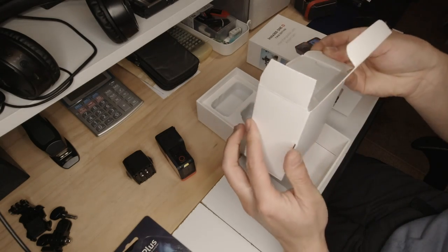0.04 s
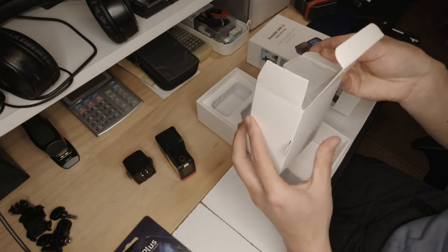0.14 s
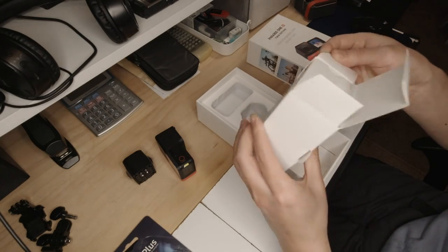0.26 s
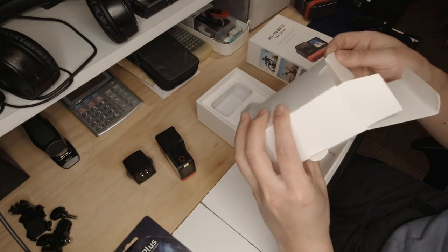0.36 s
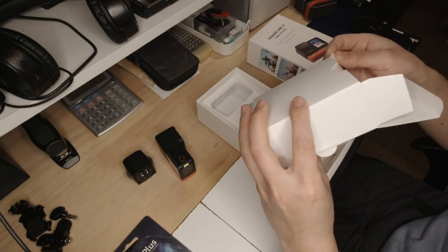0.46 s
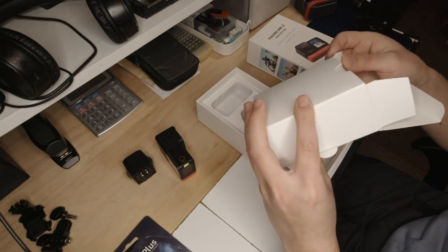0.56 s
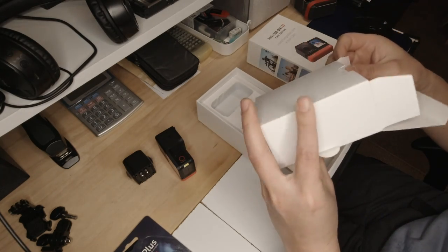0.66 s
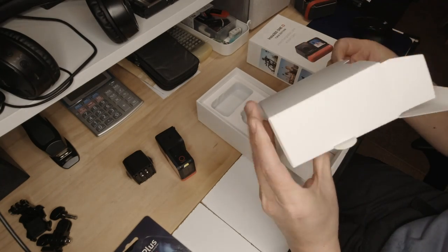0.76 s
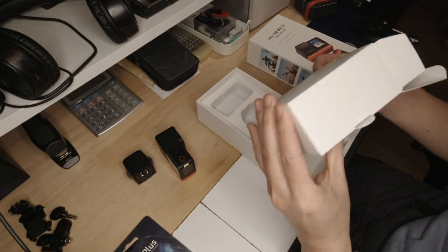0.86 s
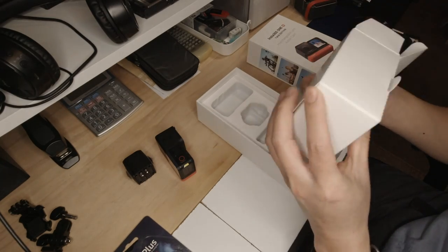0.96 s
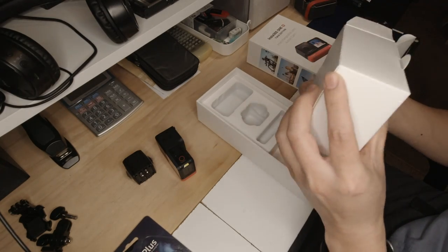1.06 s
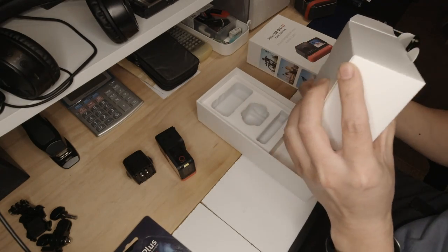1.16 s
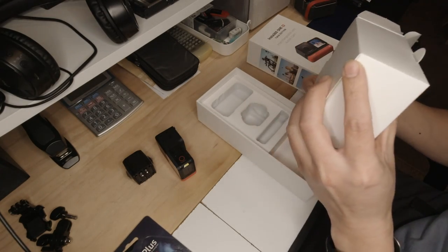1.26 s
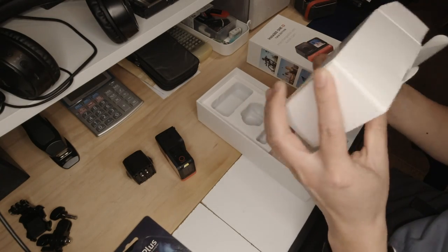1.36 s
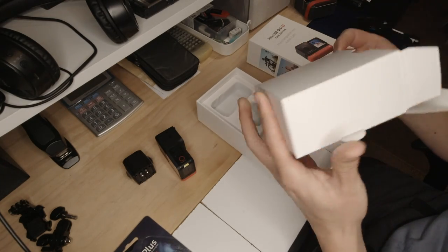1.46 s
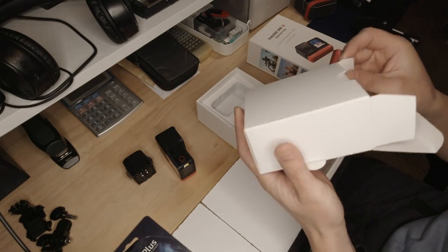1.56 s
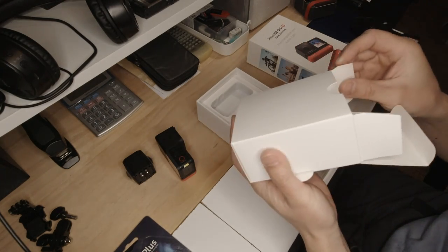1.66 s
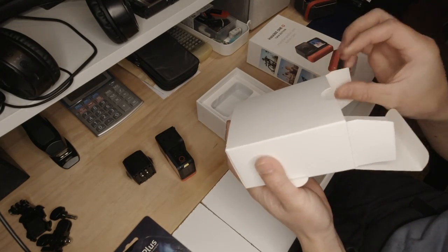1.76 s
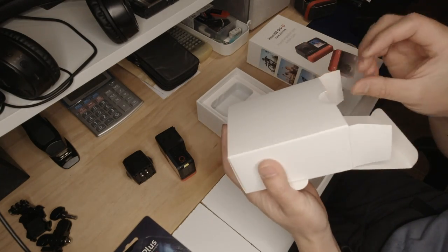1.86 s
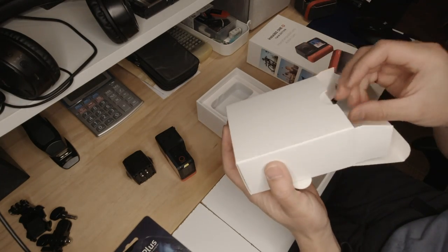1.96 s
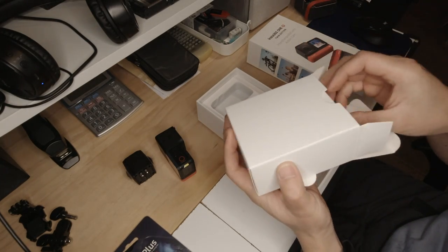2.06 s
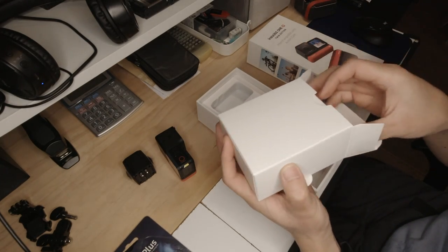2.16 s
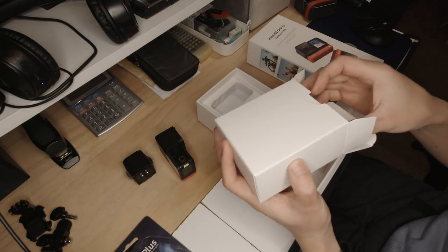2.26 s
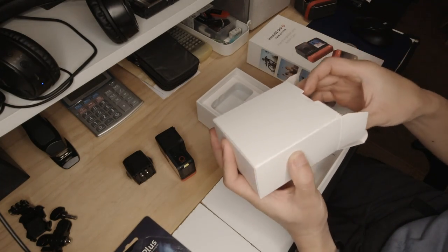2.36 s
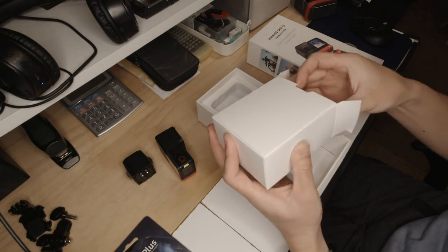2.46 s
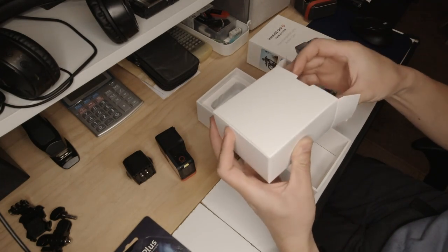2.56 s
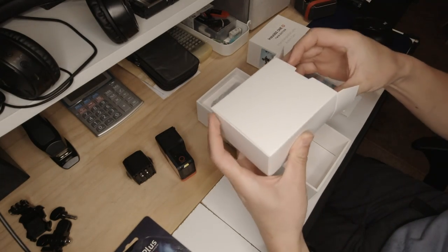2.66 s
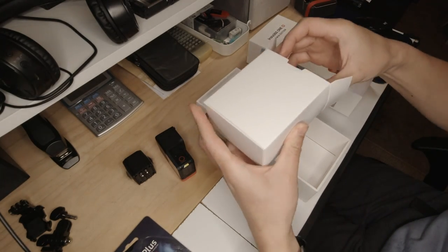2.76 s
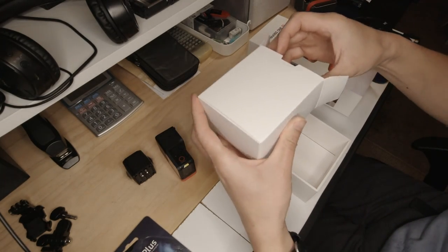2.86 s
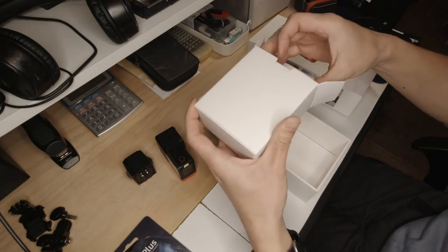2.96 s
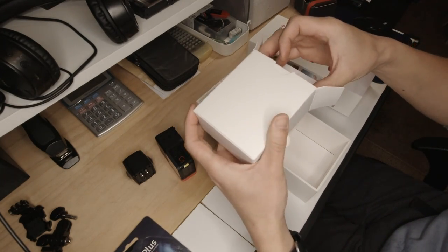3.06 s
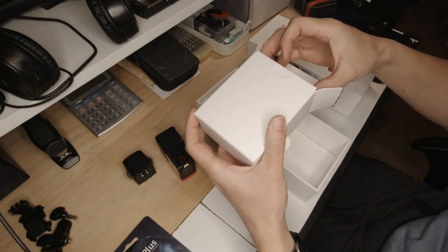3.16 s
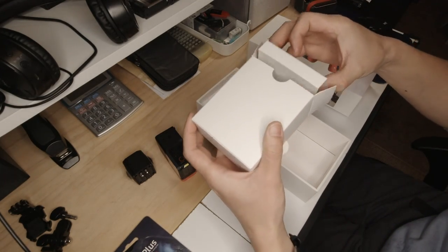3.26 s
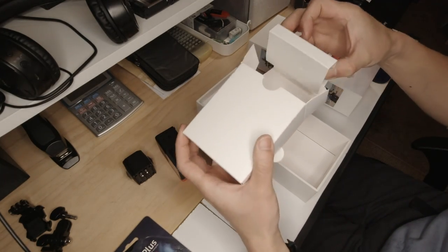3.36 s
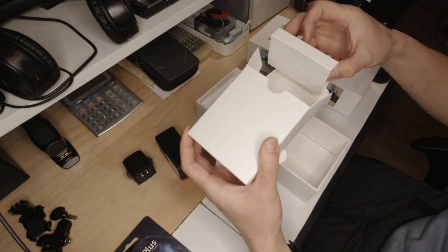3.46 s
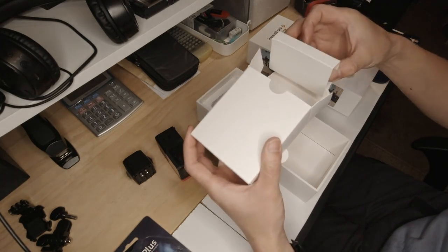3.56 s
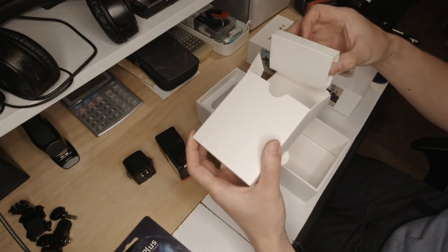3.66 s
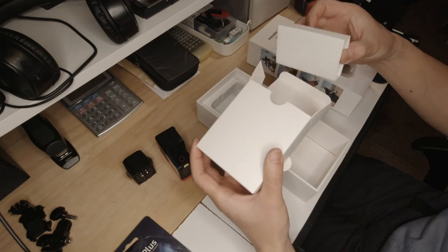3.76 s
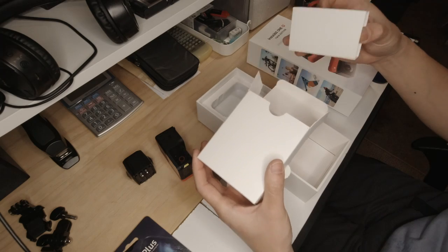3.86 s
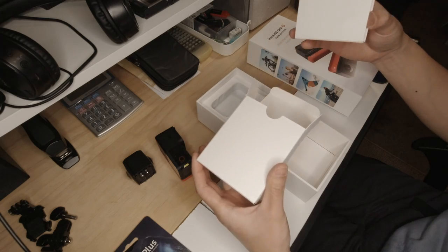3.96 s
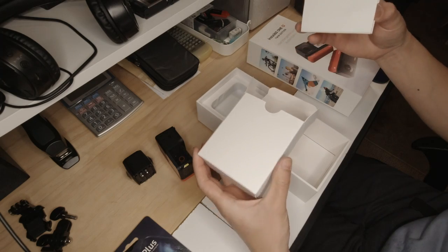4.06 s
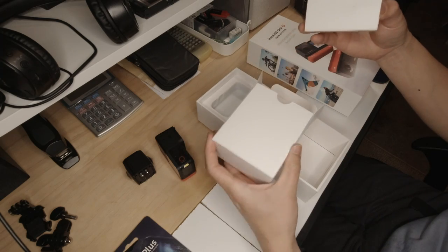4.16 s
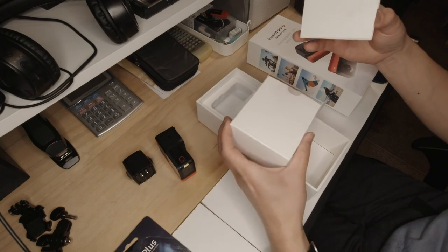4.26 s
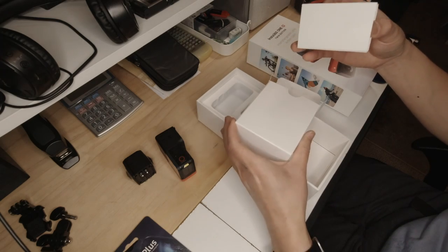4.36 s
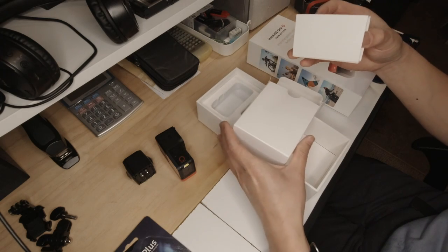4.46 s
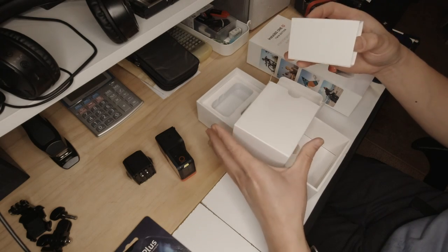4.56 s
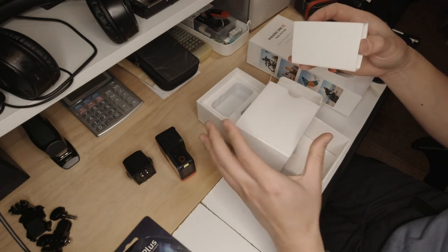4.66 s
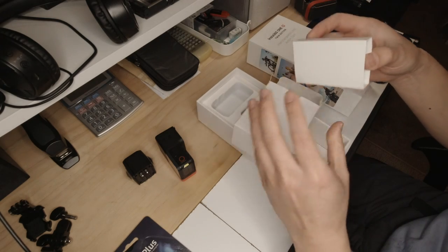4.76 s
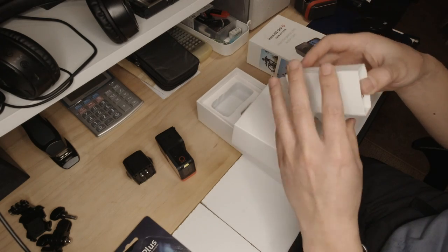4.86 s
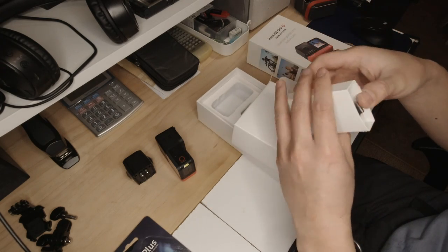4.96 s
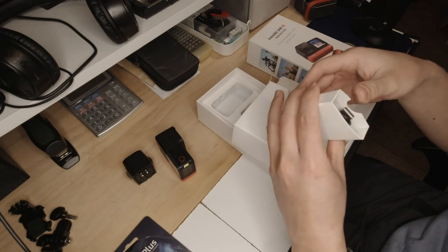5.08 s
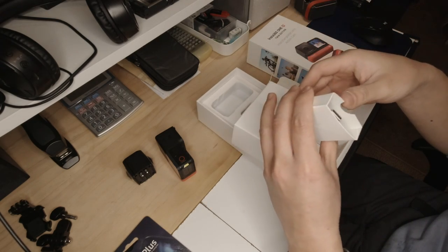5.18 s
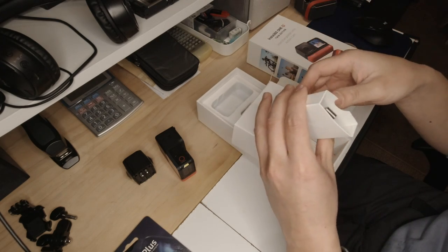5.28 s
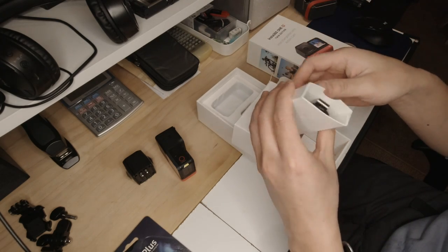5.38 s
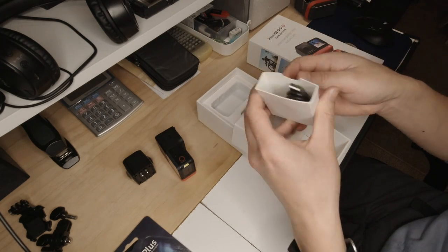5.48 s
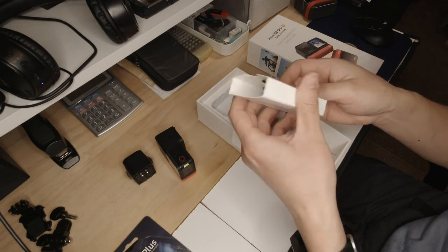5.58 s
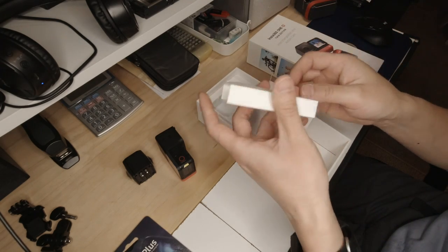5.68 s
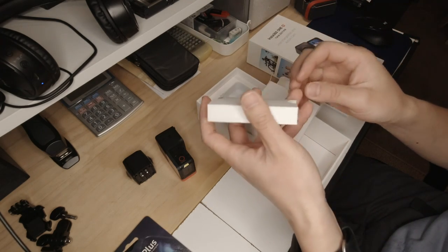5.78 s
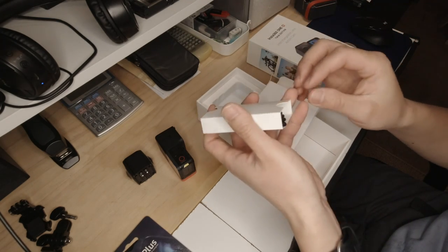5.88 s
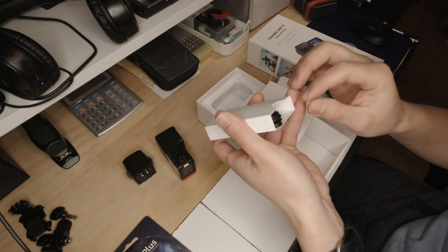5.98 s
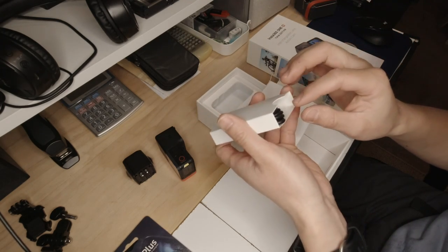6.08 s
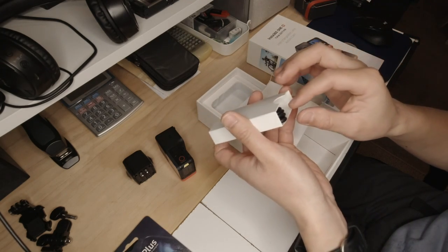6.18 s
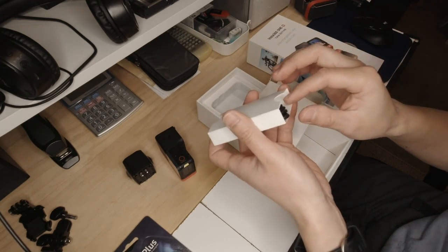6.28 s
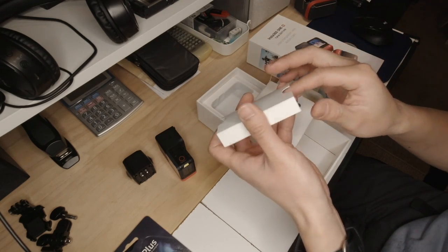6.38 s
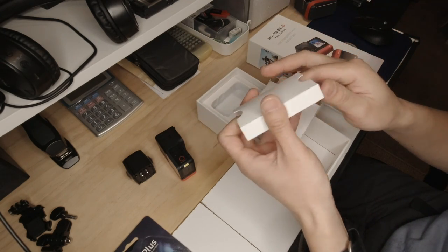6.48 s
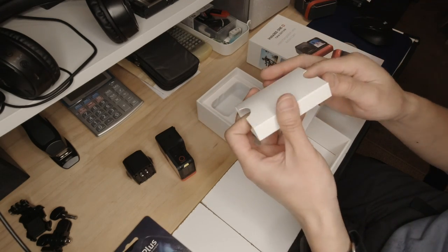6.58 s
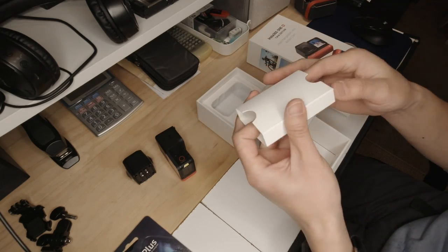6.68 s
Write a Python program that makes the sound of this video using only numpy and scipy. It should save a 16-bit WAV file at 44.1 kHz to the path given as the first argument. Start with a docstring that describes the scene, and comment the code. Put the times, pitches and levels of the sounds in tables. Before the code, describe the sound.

Hands turn a stiff cardboard box with faint ticks and knocks, slide out a small carton, set the box down, then rub and snap the carton.

```python
"""Cardboard box handled over a desk

Two hands handle a stiff box in a small room: flaps flick, card scrapes, an inner carton slides out, the box lands
on the desk, a fingertip squeaks off its glossy side and the small carton is turned over and picked open.
Noise slips and short blows drive damped card modes; desk and carton walls ring as decaying sines, the squeak is
a gliding tone. Two microphone ports hear it directly and through the room, over a low rumble and faint hiss."""
import sys
import numpy as np
from scipy import signal
from scipy.fft import rfft, irfft, next_fast_len
from scipy.io import wavfile
from scipy.ndimage import uniform_filter1d, map_coordinates

SR = 44100
rng = np.random.default_rng(int(sys.argv[2]) if len(sys.argv) > 2 else 0)


def write(x):
    x = np.atleast_2d(x).T
    wavfile.write(sys.argv[1], SR, np.round(np.clip(x, -1, 1) * 32767).astype(np.int16))


N = 296793
TIME = np.arange(N) / SR

# Knocks and flap flicks. Each row: time in s, body level (1.3-2.8 kHz) in dB before trim, thump, hollow and snap
# in dB relative to body, contact in ms (under 1 counts as 1), favoured frequency in Hz.
BOX_KNOCKS = [(0.1309, -46.5, -5.5, -20, -3, 5.4, 2410), (0.144, -46.5, -28, -8, -0.5, 5, 2450),
              (0.2894, -55, -2, -2, 2, 12, 2980), (0.6465, -46, -37, -5, -7, 2.3, 2000),
              (0.6906, -47.5, -29, -3.5, -7, 2.5, 2420), (0.7255, -54, -5, -0.5, -13, 2.7, 2590),
              (0.866, -54, 3.5, 11, -10.5, 4.8, 950), (0.9045, -55, 9.5, 1, -3.5, 3.5, 1890),
              (0.9465, -42.5, -13, 6, -20, 1, 1580), (0.9841, -40.5, -8.5, 3.5, -25, 10.5, 2200),
              (1.0324, -37.5, -25, -9, -14.5, 6.6, 2200), (1.0375, -38.5, -21, 2.5, -16, 2.2, 1480),
              (1.043, -39, -22, -2, -18, 4.8, 2210), (1.41, -59.5, -5.5, -13, 1.5, 2.5, 2100),
              (1.617, -57.5, -14, -7, -7, 3, 2000), (1.6643, -38.5, -1, 8, -10, 1, 1150),
              (1.746, -42.5, -17, -7.5, -23, 2.5, 1600), (1.9345, -53.5, -2, -15, -26, 5.3, 2270),
              (2.093, -36.5, -13, -1, -15.5, 5.6, 1720), (2.1228, -35.5, -29, -14, -22, 4.9, 1790),
              (2.1484, -34, -5.5, 4, -13.5, 1.6, 1470), (2.2385, -24, -15.5, -3.5, -12.5, 1.1, 1810),
              (2.4056, -40, -22, -7, -12, 18, 2020), (2.436, -48.5, -10, 4.5, -12, 3.3, 1660),
              (2.499, -38, -13, -3, -10, 10.6, 1490), (2.514, -44.5, -16.5, -11, -10, 3.7, 1470),
              (2.639, -46, -8, -24, -8, 16, 2190), (2.686, -55, -18, 2.5, -28, 2.2, 1910),
              (2.7387, -48, -10, 1, -15, 4.8, 1500), (2.7955, -32.5, -25, -11.5, -14.5, 0.9, 1580),
              (2.8488, -49, -4, -3, -38, 8.9, 1860), (2.9888, -43, -8, 1, -19, 5.4, 2060),
              (3.0507, -43.5, -5, 1, -3.5, 3.9, 2220), (3.1015, -44, -7, 1.5, -26, 5.8, 2110),
              (3.203, -40.5, -24, -9, -16, 4.6, 1500), (3.3347, -44, 12, 11.5, -16, 5.4, 70),
              (3.3472, -35.5, -15, 1.5, 0, 1.3, 990), (3.422, -51.5, 8, 3.5, -10, 5.7, 2200),
              (4.3658, -42, -15, -9, 3, 1.5, 2900), (4.3684, -28.5, -12.5, -2.5, 4, 1.6, 2920),
              (4.3706, -32.5, -12, -5, 2, 0.72, 2910), (4.3852, -31.5, -14, -7, -16, 3, 2300),
              (4.397, -41.5, -7, -15, -5, 2.7, 2090), (4.4231, -27.5, -13, 3, -13, 1.3, 2070),
              (4.4262, -29.5, -13, 2, -13, 5, 1480), (4.4413, -31, -16, -4.5, -13.5, 14, 1682),
              (4.451, -36, -10, -3, -15, 7, 1500), (4.4714, -28.5, -8.5, -2.5, -7.5, 8, 1360),
              (4.4863, -30, -6, -2, -20, 2.1, 1390), (4.4895, -30, 0.5, -1.5, -16, 1.6, 2090),
              (4.5078, -38.5, -3.5, 8, -26, 3.5, 1300), (4.9625, -73.5, 20, 5, -11, 5.1, 1500)]
# Strokes of skin and card. Each row: start in s, length in s, level at the end in dB before trim, swell on the
# way in dB, hollow and snap in dB relative to body, favoured frequency in Hz.
BOX_STROKES = [(0.004, 0.0051, -51, 3.5, 1, -4.5, 1950), (0.135, 0.054, -56, -3, -3.5, -11, 2380),
               (0.295, 0.018, -50.5, 2, -7, -2.5, 2530), (0.615, 0.068, -54, -2.5, -2.5, -6, 1500),
               (0.695, 0.056, -57, -4, -3.5, 0, 2600), (0.955, 0.047, -49, -5, 0.5, -8, 1420),
               (1.025, 0.019, -38.5, 5, -7.5, -6, 2260), (1.06, .07, -58, -9.5, -5.5, -5.5, 2190),
               (1.41, 0.15, -63.5, -6, -3, -3, 2180), (1.675, 0.082, -58, -7.5, -9, -5, 1390),
               (1.81, 0.045, -55.5, 5, -5.5, -5, 1690), (2.11, 0.098, -48, -5, -8.5, -4.5, 1660),
               (2.25, 0.099, -52.5, 4.5, -9.5, -5.5, 1920), (2.355, 0.067, -40, 5, -8, -12, 1540),
               (2.475, 0.039, -36.5, 5, -4.5, -7.5, 1560), (2.54, 0.049, -57.5, -7, 2, -3, 1100),
               (2.64, 0.072, -50, -4, -5.5, -9, 1540), (2.75, 0.03, -55.5, -1, -7, -7, 1610),
               (2.812, 0.048, -44, -1.5, -5.5, -13.5, 1600), (2.88, 0.07, -47.5, -3, -3, -11, 1820),
               (2.97, 0.23, -57.5, -5.5, -2, -3, 2100), (4.14, 0.05, -67, -2, -4, -1.5, 3010),
               (4.378, 0.029, -42, -5, -9, -1, 4050), (4.515, 0.057, -54.5, -10.5, -0.5, -16, 1620)]
# Panel and air modes. Each row: frequency in Hz, width in Hz, gain in dB.
BOX_MODES = [(72, 84, -3), (106.5, 39, -4), (203, 180, -5.5), (335, 230, -0.5), (582, 87, -8),
             (755, 65, -1), (904, 170, 4.5), (1014, 87, 1), (1163, 59, -6), (1276, 65, -9.5),
             (1510, 136, -2), (1737, 130, -5.5), (1882, 350, -0.5), (2067, 385, -3), (2308, 216, -2),
             (2500, 200, -8.5), (2963, 230, -8), (3300, 1000, -18), (4064, 390, -18.5), (4580, 140, -31)]
# fingers shifting their grip; hollow and snap relative to the grip level
HELD_UNTIL_S, GRIP_DB, GRIP_HOLLOW_DB, GRIP_SNAP_DB = 4.36, -69, -8, -4
GRIP_THUMP_REL_HOLLOW_DB = -10.0
BOX_SCRAPE_TRIM_DB, BOX_KNOCK_TRIM_DB = -2.0, 0.1


def box():
    """The big box: slips and blows drive its panel and air modes, fingers shift while it is held."""
    force = slipping(slips_per_s=300, spread_db=4.5, smooth_db=-1.0, jerk_db=2.0, jerk_rate=100)
    scrapes = rubs(BOX_STROKES, force, BOX_MODES, bass_db=-10.5, detune=0.034, scatter_db=0.5)

    thump, hollow, body, snap = friction(force, BOX_MODES, shift_db=4.0, shift_rate=11)
    low = undb(GRIP_HOLLOW_DB) * (undb(GRIP_THUMP_REL_HOLLOW_DB) * thump + hollow)
    grip = undb(GRIP_DB) * wander(1.0, 1.4) * (TIME < HELD_UNTIL_S)
    fingers = grip * (low + body + undb(GRIP_SNAP_DB) * snap)

    ticks = grip_ticks(count=9, spread_db=6.5, thump_db=-12.5, hollow_db=-1.5, snap_db=-7,
                       contact_ms=3.8, focus_hz=1920)
    hits = knocks(BOX_KNOCKS + ticks, BOX_MODES, crush_db=-4.0, lead_db=-24.5, lead_s=0.01,
                  tail_db=-42.5, tail_s=0.017, detune=0.022, scatter_db=3.0, tick_db=-19.5)
    return undb(BOX_SCRAPE_TRIM_DB) * scrapes + fingers + undb(BOX_KNOCK_TRIM_DB) * hits


GRIP_TICK_MIN_DB = -64.5  # before the knock trim


def grip_ticks(count, spread_db, thump_db, hollow_db, snap_db, contact_ms, focus_hz):
    """Faint knock rows at random moments while the box is held, one in each equal span."""
    rows = []
    for k, (when, size) in enumerate(rng.random((count, 2))):
        s = HELD_UNTIL_S * (k + 1 - when / 2) / count
        db = GRIP_TICK_MIN_DB + spread_db * size
        rows.append((s, db, thump_db, hollow_db, snap_db, contact_ms, focus_hz))
    return rows


# Snaps and catches. Each row: time in s, body level (1.3-2.8 kHz) in dB before trim, hollow and snap in dB
# relative to body, contact in ms, favoured frequency in Hz.
CARTON_SNAPS = [(3.4089, -37.5, -18, -20, 4.3, 2260), (3.429, -42.5, -13, 1.5, 7, 2170),
                (5.0215, -46.5, -14, -12, 4.3, 2400), (5.071, -47, -6, -13, 4, 1790),
                (5.0822, -31, -6.5, -0.5, 3.5, 3870), (5.089, -31, -10, -8, 2.4, 1860),
                (5.1461, -41.5, -11, -20, 5, 1950), (5.2025, -32, -10.5, -9, 7.1, 2380),
                (5.232, -35.5, -8, -7, 2.2, 1870), (5.2376, -16.5, -16.5, -12, 2.9, 1805),
                (5.911, -46, -22, -31, 3, 2040), (6.211, -22.5, -5, -15.5, 1.6, 1980),
                (6.383, -48, -8.5, -19, 1.5, 2220), (6.4809, -32.5, -13.5, -18, 3.5, 2180),
                (6.5689, -40, -18, -11, 8.2, 2210), (6.6902, -28, -16, -30, 1.42, 1900),
                (6.6965, -35, -11, -26, 2.1, 2030), (6.7065, -34, -11, -22, 2.1, 2020),
                (6.713, -32, -9.5, -19, 1.9, 1920), (6.7225, -33, -12, -20, 1.5, 2000)]
# Strokes. Each row: start in s, length in s, level at the end in dB before trim, swell on the way in dB,
# snap in dB relative to body, favoured frequency in Hz.
CARTON_STROKES = [(3.375, 0.081, -42.5, -2.5, 0.5, 2270), (5.027, 0.029, -45.5, -3.5, -8.5, 2400),
                  (5.094, 0.12, -48, 0.5, -5, 1230), (5.253, 0.06, -49, -4, -3.5, 3470),
                  (5.583, 0.044, -46.5, -1, -10, 2467), (5.636, 0.17, -56.5, -6.5, -7, 2220),
                  (5.991, 0.069, -43.5, 0, -17.5, 2090), (6.083, 0.033, -52.5, 2.5, -8.5, 2170),
                  (6.21, 0.072, -41, -3, -5, 2260), (6.318, 0.046, -42.5, -3, -9.5, 2250),
                  (6.399, 0.077, -41, 6, -7, 2220), (6.51, 0.067, -40, 0, -3.5, 4020),
                  (6.584, 0.028, -40.5, -4, -5, 2250), (6.625, 0.083, -44, 0.5, -7.5, 2080),
                  (6.69, .03, -37, 3, -8, 1960)]
# Panel and air modes. Each row: frequency in Hz, width in Hz, gain in dB.
CARTON_MODES = [(415, 1900, -27.5), (826, 280, -26.5), (1245, 110, -12), (1794, 83, -2.5), (1859, 82, 1.5),
                (1977, 124, 0.5), (2210, 150, -2.5), (2386, 210, -8.5), (2900, 200, -14), (3530, 210, -18),
                (3865, 190, -11), (4910, 220, -24.5), (6150, 180, -23)]
CARTON_THUMP_DB = -34  # relative to body: so small a carton gives little bass, however it is caught
CARTON_RUB_HOLLOW_DB = -15  # relative to body: little hollow tone when rubbed
CARTON_SCRAPE_TRIM_DB, CARTON_SNAP_TRIM_DB = -2.5, -1.5


def carton():
    """The small carton: stiffer panels, so its modes ring higher under slips and blows."""
    force = slipping(slips_per_s=450, spread_db=1.5, smooth_db=0.0, jerk_db=2.0, jerk_rate=82)
    passes = [(s, length, db, swell_db, CARTON_RUB_HOLLOW_DB, snap_db, focus_hz)
              for s, length, db, swell_db, snap_db, focus_hz in CARTON_STROKES]
    scrapes = rubs(passes, force, CARTON_MODES, bass_db=-9.5, detune=0.024, scatter_db=0.0)

    snaps = [(s, db, CARTON_THUMP_DB, *rest) for s, db, *rest in CARTON_SNAPS]
    hits = knocks(snaps, CARTON_MODES, crush_db=-4.0, lead_db=-11.5, lead_s=0.0043,
                  tail_db=-33.5, tail_s=0.019, detune=0.007, scatter_db=1.5, tick_db=-30)
    return undb(CARTON_SCRAPE_TRIM_DB) * scrapes + undb(CARTON_SNAP_TRIM_DB) * hits


# Inner carton pulled along its sleeve. Each row: time in s, body level in dB, hollow and snap in dB relative to body.
SLIDE_PULL = [(3.095, -64, -1.5, -14.5), (3.108, -46.5, -4, -10), (3.145, -41, -5.5, -10.5),
              (3.195, -44.5, -4.5, -23), (3.21, -39.5, -5, -16), (3.25, -35.5, -8.5, -12),
              (3.3, -34.5, -4.5, -11), (3.345, -35.5, -5, -7.5), (3.375, -45, -7.5, -5)]
# Broad resonances of the sleeve with the carton inside. Each row: frequency in Hz, width in Hz, gain in dB.
SLEEVE_MODES = [(139, 97, -12), (328, 120, -13), (940, 260, -3.5), (1530, 210, 0.5), (1880, 300, -2),
                (2200, 330, -2.5), (2450, 290, -5), (3050, 500, -14.5), (3763, 340, -12),
                (4930, 700, -27.5)]
SLEEVE_RISE_PER_S = 0.15  # fraction by which the resonances creep upward as the carton comes out
SLIDE_THUMP_REL_HOLLOW_DB = -9.5


def slide():
    """Card over card: dense, even slips drive the sleeve resonances, which rise during the pull."""
    s, _, hollow_db, snap_db = np.transpose(SLIDE_PULL)
    force = slipping(slips_per_s=1600, spread_db=2.5, smooth_db=-4.5, jerk_db=1.2, jerk_rate=180)
    tuning = 1 + SLEEVE_RISE_PER_S * (np.clip(TIME, s[0], s[-1]) - s.mean())
    rasp = resample(ring(force, SLEEVE_MODES), tuning)
    thump, hollow, body, snap = [unit(part) for part in bands(rasp)]
    low = (undb(SLIDE_THUMP_REL_HOLLOW_DB) * thump + hollow) * undb(np.interp(TIME, s, hollow_db))
    high = snap * undb(np.interp(TIME, s, snap_db))
    return (low + body + high) * gain_curve(SLIDE_PULL, axis=1)


# Inner carton leaving its sleeve. Each row: time in s, chatter rate in Hz, level in dB before trim.
SLIDE_CHATTER = [(3.37, 2040, -43.5), (3.418, 2120, -42), (3.432, 2157, -33.5), (3.447, 2166, -40),
                 (3.464, 2213, -34), (3.472, 2290, -64)]
UPPER_MODE_RATIO, UPPER_MODE_DB = 1.86, -2.0  # the panel's next mode sings along
CHATTER_TRIM_DB = -1.5


def chatter():
    """Card sticks and slips in spurts, locked to two modes of the carton's panel: a rough squeal."""
    s, hz, _ = np.transpose(SLIDE_CHATTER)

    def mode(ratio):
        cycles = ratio * np.cumsum(np.interp(TIME, s, hz) * wander(0.45, 600)) / SR
        return np.sin(2 * np.pi * cycles) * wander(4, 300)

    squeal = unit(mode(1) + undb(UPPER_MODE_DB) * mode(UPPER_MODE_RATIO))
    return undb(CHATTER_TRIM_DB) * squeal * gain_curve(SLIDE_CHATTER, axis=2)


# Cut edges dragged over coated card. Each row: start in s, length in s, whistle level at the end in dB,
# swell on the way in dB, hiss in dB relative to the whistle, before trim.
EDGE_DRAGS = [(2.16, 0.077, -82, 12.5, 28.5), (3.275, 0.09, -65, 5.5, 13), (3.38, 0.088, -79.5, 5, 12),
              (6.152, 0.015, -45, 3.5, -18), (6.19, 0.027, -52, 5, 1.5), (6.215, 0.05, -56.5, -5, -4),
              (6.27, 0.047, -51, 0, -11), (6.34, 0.16, -61, -8, -6), (6.535, 0.09, -68.5, -4, 3),
              (6.63, 0.029, -69, -7, -4)]
# Whistle resonances of the edge. Each row: frequency in Hz, width in Hz, gain in dB.
EDGE_WHISTLE = [(4980, 160, -13.5), (5780, 59, -3.5), (6270, 140, -20.5), (6420, 120, -23)]
# Hiss resonances of the edge. Each row: frequency in Hz, width in Hz, gain in dB.
EDGE_HISS = [(6430, 790, -11.5), (8410, 590, -7.5), (9230, 320, -4.5), (8950, 400, 0.5), (9600, 400, -5)]
EDGE_SAG_PER_S, EDGE_SAG_START_S = 0.054, 6.15  # pitch sinks as the flap's edge comes free
HISS_LOW_HZ, HISS_TRIM_DB = 6200, -4.0


def edges():
    """A cut edge chatters very fast on the coating: a thin whistle and a clumped hiss, both sinking."""
    force = slipping(slips_per_s=1000, spread_db=1.5, smooth_db=-5.0, jerk_db=2.5, jerk_rate=45)
    tuning = 1 - EDGE_SAG_PER_S * np.maximum(TIME - EDGE_SAG_START_S, 0)
    whistle = ring(force, EDGE_WHISTLE) * wander(2.2, 35)
    hiss = sum(ring(force, [mode]) * wander(4.0, 20) for mode in EDGE_HISS)
    hiss = signal.sosfilt(signal.butter(3, HISS_LOW_HZ, "high", fs=SR, output="sos"), hiss)
    whistle, hiss = unit(resample(whistle, tuning)), unit(resample(hiss, tuning))
    return whistle * strokes(EDGE_DRAGS) + undb(HISS_TRIM_DB) * hiss * strokes(EDGE_DRAGS, axis=4)


# Card edge drawn across a panel, one list per pass. Each row: time in s, resonance in Hz, level in dB before trim.
EDGE_GLIDES = [
    [(1.795, 895, -63), (1.82, 1053, -53), (1.835, 1423, -58), (1.852, 1740, -50), (1.864, 1790, -67)],
    [(5.09, 2190, -48.5), (5.12, 2280, -41.5), (5.15, 2210, -48.5), (5.178, 2110, -45), (5.2, 2355, -44.5),
     (5.23, 2380, -47)],
    [(5.975, 2005, -58), (5.997, 2040, -43), (6.035, 2076, -42), (6.06, 2040, -46), (6.075, 2070, -61)],
    [(6.49, 2050, -50), (6.55, 2167, -38.5), (6.6, 2150, -41), (6.66, 2100, -53)],
]
GLIDE_TRIM_DB = -3.0


def glides(width_hz):
    """Slips ring a narrow resonance whose pitch moves with the point of contact."""
    force = slipping(slips_per_s=570, spread_db=2.5, smooth_db=-1.0, jerk_db=-0.5, jerk_rate=180)
    lowpass = signal.butter(2, width_hz / 2, fs=SR, output="sos")
    # two slow signals on quadrature carriers make one moving band
    slow_cos, slow_sin = unit(signal.sosfilt(lowpass, [force, force[::-1]]))
    out = np.zeros(N)
    for rows in EDGE_GLIDES:
        s, hz, _ = np.transpose(rows)
        phase = 2 * np.pi * np.cumsum(np.interp(TIME, s, hz)) / SR
        out += (slow_cos * np.cos(phase) + slow_sin * np.sin(phase)) * gain_curve(rows, axis=2)
    return undb(GLIDE_TRIM_DB) * out


# Card bending. Each row: start in s, length in s, level at the end in dB, swell on the way in dB.
CRACKLES = [(0.62, .13, -77, 1), (0.93, .14, -64, 2.5), (1.42, .14, -76, 0), (1.635, .04, -62, 1),
            (2.38, .14, -72, 5.5), (2.8, .15, -74.5, -2), (4.39, 0.11, -51, 0), (4.49, 0.063, -66, -13)]
# What the fibres ring with. Each row: frequency in Hz, width in Hz, gain in dB.
FIBRE_MODES = [(3400, 600, -5), (4000, 440, 0.5), (4710, 570, -9.5), (5900, 700, -24.5)]


def crackle():
    """Single fibres break in tiny bright ticks as the card bends."""
    force = slipping(slips_per_s=420, spread_db=4.5, smooth_db=-12.5, jerk_db=2.5, jerk_rate=60)
    return unit(ring(force, FIBRE_MODES)) * strokes(CRACKLES)


SQUEAK_START_S, SQUEAK_FREE_S, SQUEAK_END_S = 4.765, 4.813, 4.856
SQUEAK_SLOW_HZ, SQUEAK_FAST_HZ, SQUEAK_GLIDE_S = 198, 335, 0.012
SQUEAK_DB, SQUEAK_DB_PER_OCTAVE, SQUEAK_EDGE_S = -33, -16, 0.0045  # level at the slow rate; fainter above
SQUEAK_PARTIALS_DB = [-1.5, -27, -42]


def squeak():
    """Skin sticks and slips faster as the finger leaves; the soft pad gives a nearly pure tone."""
    freed = (1 + np.tanh((TIME - SQUEAK_FREE_S) / SQUEAK_GLIDE_S / 2)) / 2
    hz = SQUEAK_SLOW_HZ + (SQUEAK_FAST_HZ - SQUEAK_SLOW_HZ) * freed
    phase = 2 * np.pi * np.cumsum(hz * wander(0.3, 220)) / SR
    tone = sum(undb(db) * np.sin(k * phase) for k, db in enumerate(SQUEAK_PARTIALS_DB, 1))
    tone = unit(tone * wander(1.6, 200))
    outside_s = abs(TIME - np.clip(TIME, SQUEAK_START_S, SQUEAK_END_S))
    contact = np.exp(-outside_s / SQUEAK_EDGE_S) + 1e-9
    octaves = np.log2(hz / SQUEAK_SLOW_HZ)
    return tone * contact * undb(SQUEAK_DB + SQUEAK_DB_PER_OCTAVE * octaves)


# The box lands on an edge, then falls flat. Each row: time in s, level in dB.
LANDINGS = [(4.4234, -40), (4.487, -30.5)]
# Desk top modes. Each row: frequency in Hz, t60 in s, gain in dB.
DESK_MODES = [(114.4, 0.26, -2), (208, 0.17, -16), (267, 0.31, -12), (559.4, 0.13, -1.5), (619.4, 0.12, 1),
              (713, 0.24, -3), (1014, 0.22, -5.5)]


def desk():
    """The desk top rings under the landing box, which damps it unevenly as it settles."""
    return ringing(LANDINGS, DESK_MODES) * wander(2.8, 170)


# Snaps into the grip. Each row: time in s, level in dB.
WALL_SNAPS = [(5.24, -34), (6.212, -47)]
# Carton wall modes. Each row: frequency in Hz, t60 in s, gain in dB.
WALL_MODES = [(1220, 0.16, -16.5), (1783, 0.29, -4), (1833, 0.35, -2.5), (3530, .28, -9.5),
              (3590, 0.27, -11), (3800, 0.12, -15.5)]


def walls():
    """The carton's walls ring on after a snap; the fingers damp them unevenly."""
    return ringing(WALL_SNAPS, WALL_MODES) * wander(1.9, 150)


def ringing(blows, modes):
    """A surface rings on after each blow as a sum of decaying sines."""
    t = np.arange(SR // 2) / SR
    response = sum(undb(db) * np.exp(-np.log(1000) * t / t60) * np.sin(2 * np.pi * hz * t)
                   for hz, t60, db in modes)
    out = np.zeros(N + SR)
    for s, db in blows:
        start = int(s * SR)
        out[start:start + len(t)] += undb(db) * response
    return out[:N]


# Ticks of the cut edges. Each row: frequency in Hz, width in Hz, gain in dB.
TICK_MODES = [(4600, 350, -2), (6200, 360, -13.5), (9030, 890, -8)]


def knocks(rows, modes, crush_db, lead_db, lead_s, tail_db, tail_s, detune, scatter_db, tick_db):
    """Card strains briefly, gives way with a push and a crush of fibres, then chatters out."""
    lead = SR // 40
    t = np.arange(-lead, SR // 12) / SR
    after = np.maximum(t, 0)
    level_window = slice(lead, lead + SR // 66)
    strain = undb(lead_db) * np.exp(-abs(t) / lead_s)
    tail = undb(tail_db) * np.exp(-after / tail_s)
    out = np.zeros(N + SR)
    for s, db, thump_db, hollow_db, snap_db, contact_ms, focus_hz in rows:
        contact_ms = max(contact_ms, 1)
        shape = np.where(t < 0, strain, np.exp(-after * 1000 / contact_ms) + tail)
        uneven = undb(2.86 * rng.standard_normal(len(t)))
        crush = rng.standard_normal(len(t)) * uneven * shape
        force = undb(crush_db) * crush * np.sqrt(contact_ms / np.sum(crush ** 2))
        force[lead] += 1  # the push

        parts = bands(ring(force, modes, 1 + detune * rng.standard_normal(), scatter_db, focus_hz))
        parts.append(ring(force, TICK_MODES))
        # softer blows make the cut edges tick far less
        edge_db = snap_db + tick_db + 1.3 * min(db + snap_db + 32.5, 0)
        start = int(s * SR) - lead - SR // 1500
        for part, rel_db in zip(parts, (thump_db, hollow_db, 0, snap_db, edge_db)):
            out[start:start + len(t)] += undb(db + rel_db) / np.std(part[level_window]) * part
    return out[:N]


def rubs(rows, force, modes, bass_db, detune, scatter_db):
    """Each stroke drives the panels from a new place and with a new grip, so it has its own colour."""
    out = np.zeros(N)
    for start, length, db, swell_db, hollow_db, snap_db, focus_hz in rows:
        effort = strokes([(start, length, db, swell_db)])
        near = effort > 0
        stretch = 1 + detune * rng.standard_normal()
        parts = bands(ring(force[near] * effort[near], modes, stretch, scatter_db, focus_hz))
        effort_rms = np.sqrt(np.mean(effort[near] ** 2))
        for part, rel_db in zip(parts, (hollow_db + bass_db, hollow_db, 0, snap_db)):
            out[near] += undb(rel_db) * unit(part) * effort_rms
    return out


STROKE_ATTACK_S, STROKE_RELEASE_S = 0.011, 0.011  # card takes hold, and comes to rest


def strokes(rows, axis=None):
    """Gain over time of strokes that swell or ease steadily; axis picks a column of relative dB."""
    power = np.zeros(N)
    for row in rows:
        start, length, db, swell_db = row[:4]
        near = slice(max(int((start - 0.1) * SR), 0), int((start + length + 0.2) * SR))
        t = TIME[near] - start
        level = db + swell_db * (np.clip(t / length, 0, 1) - 1) + (row[axis] if axis else 0)
        fade = np.maximum(-t, 0) / STROKE_ATTACK_S + np.maximum(t - length, 0) / STROKE_RELEASE_S
        power[near] += (undb(level) * np.exp(-fade)) ** 2
    return np.sqrt(power)


def friction(force, modes, shift_db, shift_rate, count=4):
    """As the point of contact moves, interleaved families of modes swell and fade."""
    families = [ring(force, modes[k::count]) * wander(shift_db, shift_rate) for k in range(count)]
    return [unit(part) for part in bands(sum(families))]


def slipping(slips_per_s, spread_db, smooth_db, jerk_db, jerk_rate):
    """Fibres catch and let go in uneven slips over a finer hiss, and the hand moves in small jerks."""
    grain = rng.standard_normal(N)
    happens = rng.random(N) < slips_per_s / SR
    size = undb(spread_db * np.minimum(rng.exponential(size=N), 3))
    slips = happens * np.sign(grain) * size
    return (unit(slips) + undb(smooth_db) * grain) * wander(jerk_db, jerk_rate)


FOCUS_DB, FOCUS_WIDTH_HZ = 9.5, 220  # each point of contact favours the modes around one frequency


def ring(force, modes, stretch=1, scatter_db=0, focus_hz=np.inf):
    """Damped modes of the card; the point of contact weights them anew."""
    out = 0
    for (hz, width, db), (sign, chance) in zip(modes, rng.standard_normal((len(modes), 2))):
        # a panel radiates only within about an octave of its own resonance
        b, a = map(np.convolve, resonator(hz * stretch, width), resonator(hz * stretch, 0.83 * hz))
        favour_db = FOCUS_DB * np.exp(-((hz - focus_hz) / FOCUS_WIDTH_HZ) ** 2)
        gain = np.sign(sign) * undb(db + favour_db + scatter_db * chance)
        out = out + signal.lfilter(gain * b, a, force)
    return out


def resonator(hz, width):
    """Numerator and denominator of a band-pass with gain 1 at its centre."""
    g = 1 / (1 + np.tan(np.pi * width / SR))
    return [1 - g, 0, g - 1], [1, -2 * g * np.cos(2 * np.pi * hz / SR), 2 * g - 1]


# Edges of the thump, hollow, body and snap ranges. Each entry: frequency in Hz.
BAND_EDGES_HZ = [45, 550, 1300, 2800, 4900]
BAND_FILTERS = [signal.butter(3, hz, "band", fs=SR, output="sos")
                for hz in zip(BAND_EDGES_HZ, BAND_EDGES_HZ[1:])]


def bands(x):
    """Split into thump, hollow, body and snap ranges; soft fibres give little above that."""
    return [signal.sosfilt(sos, x) for sos in BAND_FILTERS]


def resample(x, tuning):
    """Read x at a varying speed, so its pitch follows tuning."""
    return map_coordinates(x, [np.cumsum(tuning)], mode="mirror")


def wander(db, rate):
    """A gain that drifts by chance, rate new values a second."""
    size = int(N / SR * rate) + 2
    return np.interp(TIME, np.arange(size) / rate, undb(db * rng.standard_normal(size)))


def gain_curve(rows, axis):
    """One dB column as a gain over time, near silent (-120 dB) outside its span."""
    rows = np.array(rows)
    db = np.interp(TIME, rows[:, 0], rows[:, axis], left=-120, right=-120)
    return uniform_filter1d(undb(db), size=200)


def undb(db):
    """Decibels to gain."""
    return np.exp(np.asarray(db) * (np.log(10) / 20))


def unit(x):
    """Scale to rms 1."""
    return x / np.sqrt(np.mean(x ** 2) + 1e-30)


def over_hz(points, size):
    """A table of (Hz, value) read at every bin of a transform."""
    hz, value = np.transpose(points)
    return np.interp(np.log(np.fft.rfftfreq(size, 1 / SR) + 1), np.log(hz), value)


# Phase by which the left port leads the right. Each row: frequency in Hz, lead in radians.
PORT_PHASE = [(30, .01), (1000, 0.32), (2150, 0.49), (2400, 1.52), (2750, 1.61), (3300, 1.83), (4050, 1.6),
              (5200, 1.98), (5900, 2), (11000, 1.8)]


def ports(x):
    """The direct sound meets the two microphone ports out of step."""
    size = next_fast_len(N + 2000)
    turn = np.exp(np.array([[1j], [-1j]]) * over_hz(PORT_PHASE, size) / 2)
    return irfft(rfft(x, size) * turn, size)[:, :N]


def moving_room(x, count):
    """The hands carry the card from place to place, and each place has its own reflections."""
    place = TIME / TIME[-1] * (count - 1)
    out = 0
    for k in range(count):
        here = np.cos(np.pi / 2 * np.minimum(abs(place - k), 1))
        out = out + room(x * here, wet_db=-10.0, t60_s=0.32, treble_t60_s=0.25, early_db=3.5, early_s=0.011)
    return out


def room(x, wet_db, t60_s, treble_t60_s, early_db, early_s):
    """Desk and shelves answer within milliseconds, then the small room dies away."""
    t = np.arange(SR // 2) / SR
    noise = rng.standard_normal((2, len(t)))
    low = signal.sosfilt(signal.butter(2, 2800, fs=SR, output="sos"), noise)
    tail = low * undb(-60 * t / t60_s) + (noise - low) * undb(-60 * t / treble_t60_s)
    tail = tail * (1 + undb(early_db) * np.exp(-t / early_s)) * (t > 0.003)
    low_energy = np.sum(low[0] ** 2 * undb(-120 * t / t60_s))
    response = diffuse(*tail) / np.sqrt(low_energy * SR / 5600)
    return undb(wet_db) * signal.fftconvolve(x[None], response, axes=1)[:, :N]


# How unlike the channels are in diffuse sound. Each row: frequency in Hz, side gain relative to mid in dB.
DIFFUSE_SIDE = [(40, -11.5), (250, -8), (1000, -9.5), (2500, -1), (5000, -1)]


def diffuse(mid, side):
    """Sound from all around: more alike in the bass, unrelated in the treble."""
    side = irfft(rfft(side) * undb(over_hz(DIFFUSE_SIDE, len(side))), len(side))
    return np.array([mid + side, mid - side])


# Steady air of the room. Each row: frequency in Hz, relative density in dB per Hz.
AIR = [(25, 1), (70, 0), (130, -9.5), (220, -15), (400, -25.5), (750, -21.5), (1100, -24.5), (1700, -28.5),
       (2030, -15), (2300, -23.5), (2700, -26), (4200, -35.5), (6000, -44), (8000, -53), (11000, -75.5)]
AIR_MID_DB = -59.16


def air():
    """Low rumble and faint hiss of the room: coloured noise, diffuse, barely drifting."""
    size = next_fast_len(N)
    colour = undb(over_hz(AIR, size))
    mid, side = (unit(irfft(rfft(rng.standard_normal(size)) * colour, size)) for _ in range(2))
    return undb(AIR_MID_DB) * diffuse(mid, side)[:, :N] * wander(0.36, 3.3)


def scene():
    """Both boxes, the desk and the fingertip, heard directly and through the room."""
    big_box = box() + slide() + crackle()
    small_carton = carton() + walls() + chatter()
    handling = big_box + small_carton + glides(width_hz=190) + edges() + squeak() + desk()
    return ports(handling) + moving_room(handling, count=8) + air()


TOP_HZ = 10600


def record(dry):
    """The recorder cuts the top with a steep low-pass."""
    return signal.sosfilt(signal.ellip(8, 0.2, 70, TOP_HZ, fs=SR, output="sos"), dry)


dry = scene()
out = record(dry)
write(out)
```